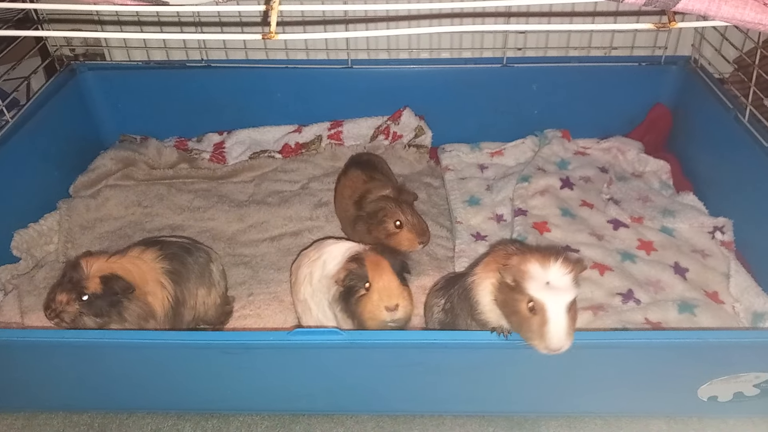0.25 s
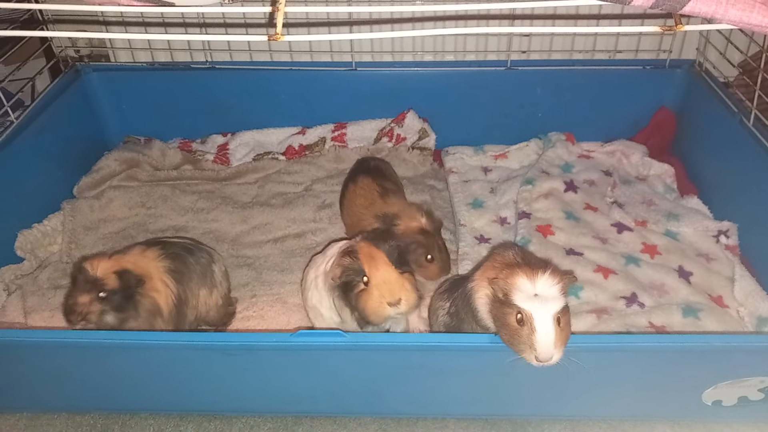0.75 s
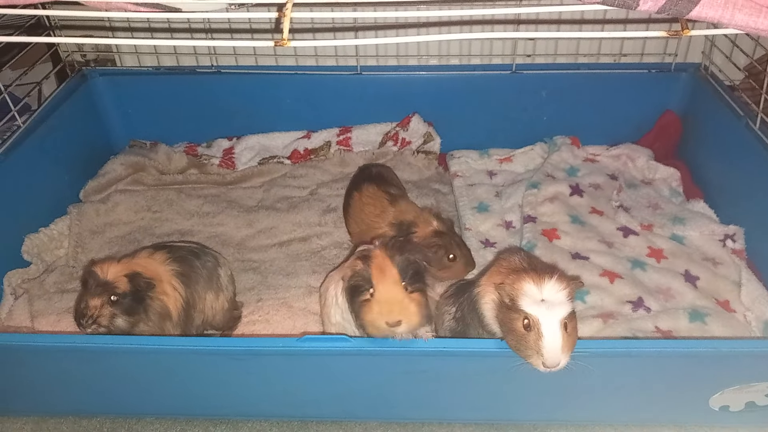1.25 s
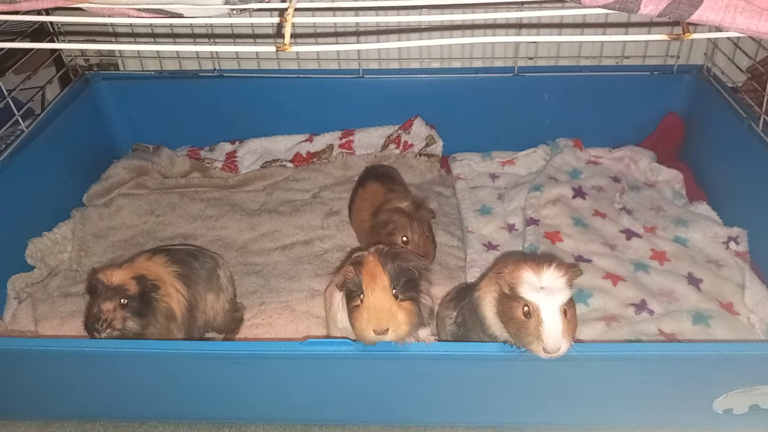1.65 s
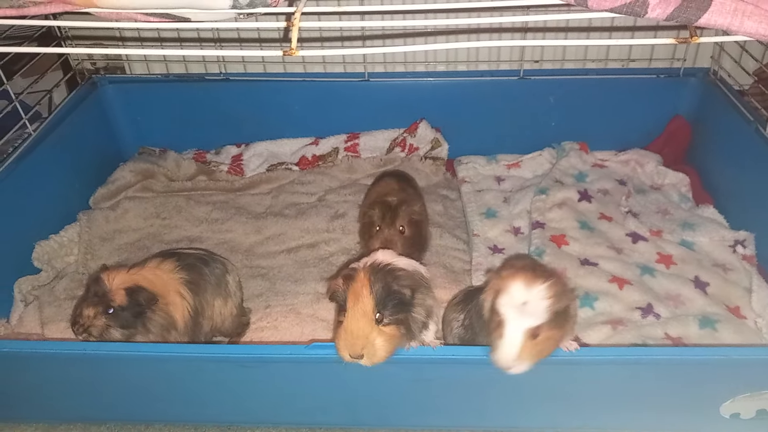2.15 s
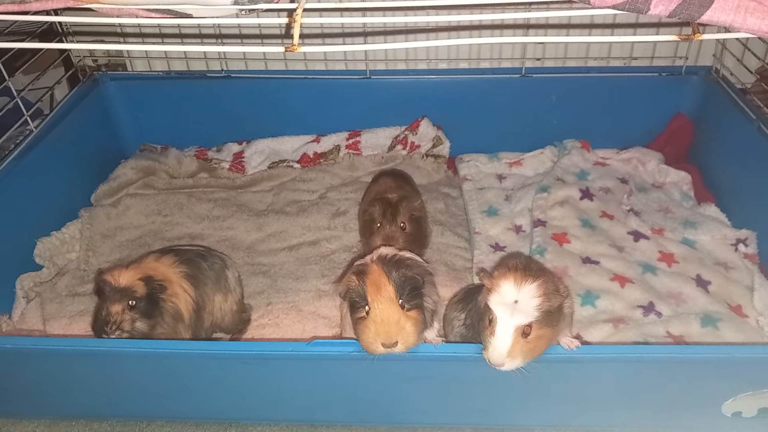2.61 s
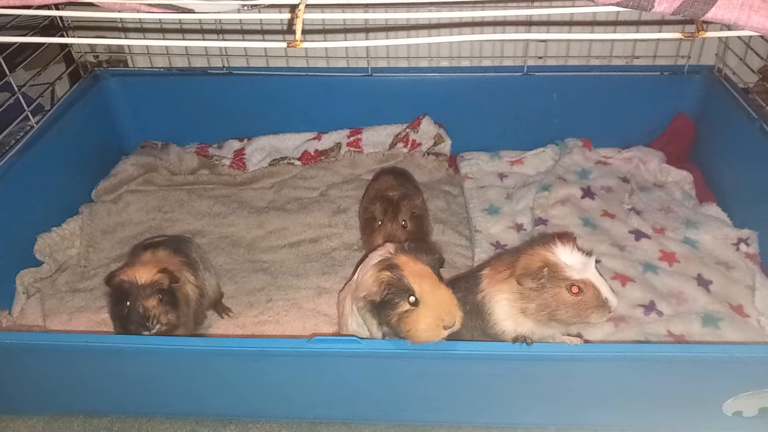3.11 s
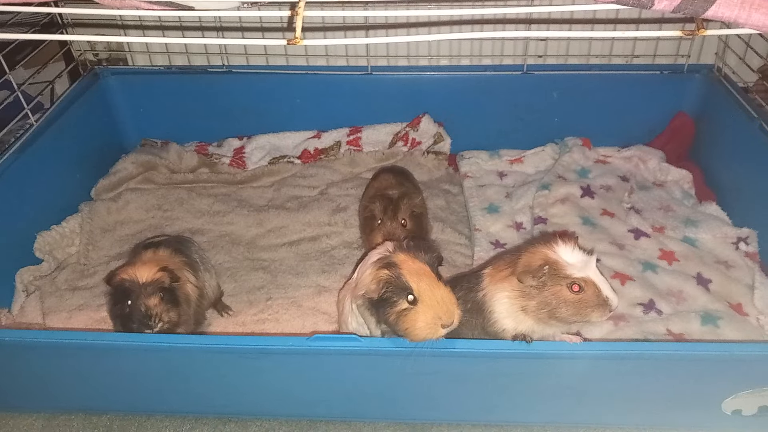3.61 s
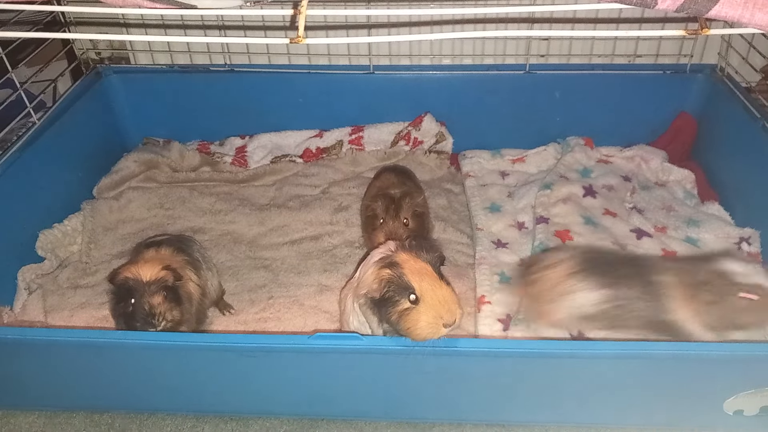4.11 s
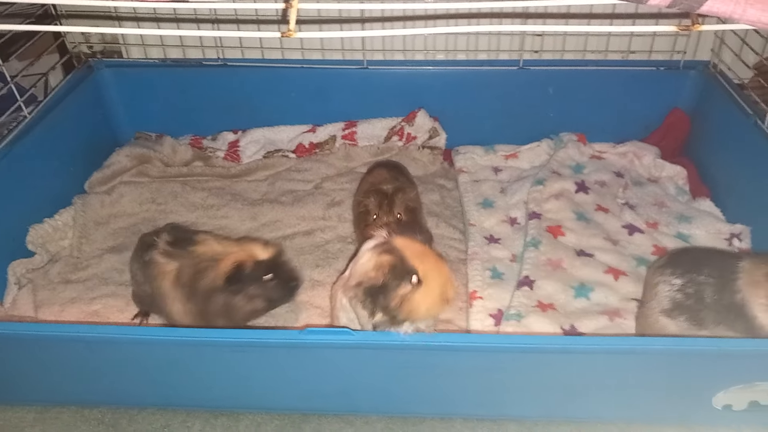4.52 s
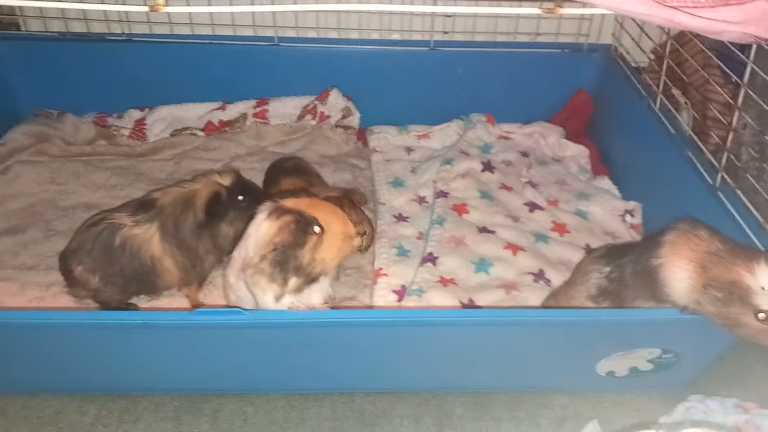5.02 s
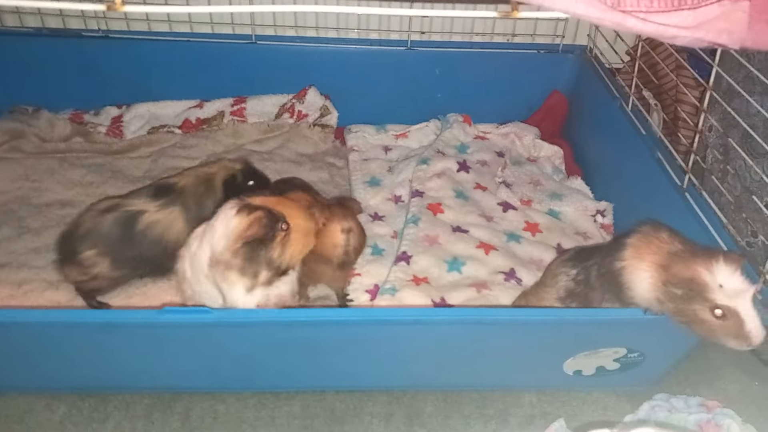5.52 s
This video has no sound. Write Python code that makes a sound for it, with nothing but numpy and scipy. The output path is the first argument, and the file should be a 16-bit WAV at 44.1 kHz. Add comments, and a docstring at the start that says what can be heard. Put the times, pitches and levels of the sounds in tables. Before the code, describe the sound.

Guinea pigs chatter in low bubbling croaks and thin rising whistles, with three sharp wheeks and a burst of claws scrabbling on a plastic tub.

```python
"""Guinea pigs beg at the rim of a plastic cage lined with fleece, close to the microphone in a quiet room.
They chatter in low pulsed croaks and thin rising whistles, and three times burst into a loud wheek of
gliding harmonics. Mostly in the middle they shift about: paws ring the tub's modes, claws crack in short
noise bursts, and fur brushes the fleece in grains and hiss. Echoes of cage and room lie behind it all."""
import sys
import numpy as np
from scipy import signal
from scipy.fft import rfft, irfft, next_fast_len
from scipy.io import wavfile

SR = 44100
rng = np.random.default_rng(int(sys.argv[2]) if len(sys.argv) > 2 else 0)


def store_pcm(level_fs):
    """Save levels as 16-bit WAV."""
    pcm = np.round(np.clip(level_fs, -1, 1) * 32767).astype(np.int16)
    wavfile.write(sys.argv[1], SR, np.atleast_2d(pcm).T)


N = 254016  # length in samples

# Colour of fur on fleece and of claws on the tub. Each row: frequency in Hz, gain in dB.
RUSTLE_COLOUR = [(59, -50), (100, -12.5), (600, -13), (1000, -9.5), (1400, -15.5), (2050, -3),
                 (2800, -16.5), (3600, -9.5), (7450, -2.5), (9210, -10), (13800, -7.5), (16000, -17.5)]


def gain_of(db):
    """Decibels to amplitude."""
    return 10 ** (np.asarray(db) / 20)


def evened(x):
    """Scales to an rms of 1."""
    return x / np.sqrt(np.mean(x ** 2) + 1e-20)


def read(points, hz):
    """Reads a (Hz, value) table on a log-frequency axis."""
    f, value = np.transpose(points)
    return np.interp(np.log(hz + 1), np.log(f), value)


def add(mix, s, sound):
    """Mixes a sound in at time s, cut at both ends of the mix."""
    start = round(s * SR)
    sound = sound[max(-start, 0):]
    part = mix[max(start, 0):][:len(sound)]
    part += sound[:len(part)]


def colour(x, points):
    """Filters by a (Hz, dB) spectrum; its resonances ring after each impulse."""
    n = next_fast_len(x.shape[-1] + 2048)
    log_gain = np.log(gain_of(read(points, abs(np.fft.fftfreq(n, 1 / SR)))))
    # minimum phase: nothing sounds ahead of its impulse
    response = np.exp(np.conj(signal.hilbert(log_gain))[:n // 2 + 1])
    return irfft(rfft(x, n) * response, n)[..., :x.shape[-1]]


def wander(n, rate_hz):
    """Smooth random drift, rms about 1, that changes up to about rate_hz times a second."""
    size = next_fast_len(n + 4096)
    f = np.fft.rfftfreq(size, 1 / SR)
    spectrum = rfft(rng.standard_normal(size)) / (1 + (f / rate_hz) ** 4)
    return evened(irfft(spectrum, size))[:n]


def resonate(x, hz, width):
    """A resonance, width in Hz and gain 1, that follows the curve hz."""
    turn = np.exp(2j * np.pi * np.cumsum(hz) / SR)
    r = np.exp(-np.pi * width / SR)
    # shift the moving centre to 0 Hz, smooth, and shift back
    return 2 * (turn * signal.lfilter([1 - r], [1, -r], x / turn)).real


def air(shared=0.6):
    """Faint room rumble and microphone hiss: coloured noise, partly shared by both channels."""
    # Each row: frequency in Hz, gain in dB.
    air_colour = [(30, -20), (98, 5.5), (190, -1.5), (780, -9), (1910, -14.5), (7670, -20), (9460, -31),
                  (16000, -22)]
    level_db = -71.5
    noise = rng.standard_normal((2, N)) + shared * rng.standard_normal(N)
    return gain_of(level_db) * evened(colour(noise, air_colour))


def ports(x, side, lead_ms):
    """Two microphone ports: the left hears x sooner by lead_ms, and the body shades each by band."""
    hz = np.fft.rfftfreq(2 * N, 1 / SR)
    ratio = gain_of(read(side, hz))
    late = np.exp(-2j * np.pi * hz * lead_ms / 1000)
    pair = np.array([ratio, late]) / np.sqrt((1 + ratio ** 2) / 2)
    return irfft(rfft(x, 2 * N) * pair)[:, :N]


def room(x, walls_db, tail_db):
    """Quick echoes from the cage walls, then the short tail of a furnished room."""
    # Time for the tail to die by 60 dB. Each row: frequency in Hz, time in s.
    room_t60 = [(150, 0.26), (2700, 0.13), (15000, 0.14)]
    t = np.arange(SR // 3) / SR
    # the tail: sparse clicks after 6 ms, dying at its own pace in each band
    taps = rng.choice([-1., 1.], (2, len(t))) * (rng.random((2, len(t))) < 3000 / SR) * (t > .006)
    hz, when, z = signal.stft(taps, SR, nperseg=256)
    fading = gain_of(-60 * when / read(room_t60, hz)[:, None])
    tail = signal.istft(z * fading, SR, nperseg=256)[1][:, :len(t)]
    # the cage: sparser clicks after 2 ms
    walls = rng.standard_normal((2, len(t))) * (rng.random((2, len(t))) < 1500 / SR)
    walls = walls * (t > .002) * np.exp(-t / 0.0023)
    echo = sum(gain_of(db) * h / np.linalg.norm(h, axis=1, keepdims=True)
               for db, h in [(walls_db, walls), (tail_db, tail)])
    common = echo.mean(0)  # long waves reach both ports alike
    echo = common + colour(echo - common, [(150, -27), (800, 2.5)])
    return signal.oaconvolve(x, echo, axes=1)[:, :N]


def placed(x, side, lead_ms, walls_db, tail_db, shading=0.1):
    """A source with its echoes, which arrive from all round and so are less one-sided."""
    diffuse = ports(x, [(hz, shading * db) for hz, db in side], lead_ms)
    return ports(x, side, lead_ms) + room(diffuse, walls_db, tail_db)


def stroke(start, rise, t60, db):
    """The level of one stroke: it gathers speed evenly, then dies away."""
    t = np.arange(N) / SR - start
    return np.clip(t / rise, 0, 1) * gain_of(db - 60 * np.maximum(t - rise, 0) / t60)


def rustle(grains_per_s=2000, spread_db=4.0, smooth=0.69, catch_db=1.5,
           scrape_hz=6000, scrape_width=1500, roam=0.5):
    """Fibres catch and let go: tiny snaps over a brushing hiss, with a scrape that roams as contact shifts."""
    # Strokes of fur and paws on fleece and plastic. Each row: start in seconds, rise in seconds,
    # time to die by 60 dB in seconds, level in dB before the mix, fizz in dB relative to the stroke.
    strokes = [ (2.456, 0.0067, 0.9, -47, -12), (2.555, 0.0081, 2.5, -53, -12),
               (3.036, 0.0024, 0.63, -41.5, -12), (3.092, 0.0065, 0.1043, -30, 2),
               (3.125, 0.014, 0.07, -30.5, -5), (3.174, 0.0038, 0.1, -42, -8),
               (3.308, 0.019, 0.3, -55.5, -20), (3.392, 0.027, 0.44, -38.5, 0),
               (3.435, 0.0087, 0.27, -33, -8), (3.468, 0.016, 0.2, -32, -5),
               (3.565, 0.014, 0.035, -30.5, 7.5), (3.75, 0.007, 1.52, -45, -12),
               (3.8, 0.063, 0.13, -44, -13), (3.908, 0.066, 0.3748, -38, -3),
               (4.097, 0.057, 0.116, -35, -3.5), (5.652, 0.0086, .2, -56.5, -12)]
    powers = np.array([stroke(*row[:4]) for row in strokes]) ** 2
    level = np.sqrt(powers.sum(0))
    fizz_level = np.sqrt(gain_of([row[-1] for row in strokes]) ** 2 @ powers)
    # the lightest touches barely sound
    grip = gain_of(catch_db * wander(N, 88.44)) * level / (level + gain_of(-65))
    snaps = rng.standard_normal(N) * (rng.random(N) < grains_per_s / SR)
    snaps = snaps * gain_of(spread_db * np.minimum(rng.exponential(1, N), 3))
    brush = evened(snaps) + smooth * rng.standard_normal(N)
    scrape = resonate(brush, scrape_hz * np.exp(roam * wander(N, 25)), scrape_width)
    fizz = evened(colour(brush, [(6000, -34.5), (11000, -4), (13500, -1), (16000, -10.5)]))
    body = evened(colour(brush + scrape, RUSTLE_COLOUR))
    return grip * (level * body + fizz_level * fizz)


def claws(decay=0.0032):
    """Each claw makes one short dry crack: noise that dies within milliseconds (decay in s)."""
    # Each row: time in seconds, starting level in dB before the mix.
    ticks = [(0.966, -47), (2.4876, -36.5), (3.0943, -20), (3.115, -25.5), (3.1362, -26), (3.1815, -26),
             (3.228, -42), (3.414, -27.5), (3.4433, -11), (3.475, -17.5), (3.502, -36), (3.5214, -31),
             (3.5552, -29), (4.1582, -25)]
    out, t = np.zeros(N), np.arange(SR // 30) / SR
    for s, db in ticks:
        noise = evened(colour(rng.standard_normal(len(t)), RUSTLE_COLOUR))
        add(out, s, gain_of(db) * np.exp(-t / decay) * noise)
    return out


def steps(scuff_db=-9, scuff_decay=0.021, thud_db=-2.0, thud_t60=0.038):
    """Paws ring the tub: weight booms its floor, a hard touch knocks its wall, each spot thuds at its pitch."""
    # Paws landing. Each row: time in seconds, level in dB before the mix, floor boom in dB,
    # wall knock in dB, thud pitch in Hz; boom and knock are relative to the level.
    landings = [(2.694, -40.5, -15, -6, 253), (2.836, -35, -40, -2, 338), (3.053, -43, -0.5, -6, 268),
                (3.09, -37.5, -0.5, -3.5, 210), (3.139, -40, 2.5, 1, 439), (3.178, -42.5, 2.5, -18, 454),
                (3.228, -49.5, -10, -1, 353), (3.444, -53, -24.5, -15.5, 477), (3.755, -40, -9.5, 11, 276),
                (4.165, -47.5, -4.5, 2, 334)]
    # Modes of the plastic tub. Each row: nominal frequency in Hz, gain in dB,
    # time to die by 60 dB in seconds.
    tub = [(110.4, -1, 0.12), (145, -5, 0.11), (184.3, -9.5, 0.075), (977, -12, 0.04), (1914, 9.5, 0.0066)]
    out, t = np.zeros(N), np.arange(SR // 4) / SR
    for s, db, boom_db, knock_db, thud_hz in landings:
        touch = [(130, boom_db), (600, 0.0031), (1400, knock_db)]
        ring = np.zeros(len(t))
        for k, (hz, mode_db, t60) in enumerate(tub):
            heights = gain_of(mode_db + read(touch, hz) - 60 * t / t60)
            detune = rng.uniform(0.88, 1.04)  # each landing shifts each mode
            ring += heights * np.sin(2 * np.pi * hz * detune * t) * (-1) ** k
        thud = gain_of(thud_db - 60 * t / thud_t60) * np.sin(2 * np.pi * thud_hz * t)
        scuff_colour = [(60, -5), (thud_hz, 8.5), (700, -8.0), (2000, knock_db - 11.0), (5000, -32)]
        scuff = evened(colour(rng.standard_normal(len(t)), scuff_colour))
        scuff = gain_of(scuff_db) * scuff * np.exp(-t / scuff_decay)
        onset = 1 - np.exp(-t / 0.00064)
        add(out, s, gain_of(db) * (ring + thud + scuff) * onset)
    return out


def gated(start, end, fade):
    """The times of a call and its soft on-off gate."""
    t = np.arange(start - fade, end + fade, 1 / SR)
    edge = np.clip(np.minimum(t - t[0], t[-1] - t) / fade, 0, 1)
    return t, np.sin(np.pi / 2 * edge) ** 2


def arched(t, start, length, db, swell_db, arch_db):
    """Progress 0-1 through a call, an arch that tops at its middle, and the level that follows both."""
    u = np.clip((t - start) / length, 0, 1)
    arch = 1 - (2 * u - 1) ** 2
    return u, arch, db + swell_db * (u - .5) + arch_db * (arch - 1)


def brightened(throat, s):
    """The throat's colour at time s: urgency lifts its treble and thins its middle."""
    # Urgent chatter is brighter than calm chatter. Each row: time in seconds, treble lift in dB.
    urgency = [(0, 7.5), (0.8, 0), (4.45, -1.5), (4.8, -18), (5.4, -34.5)]
    lift_db = np.interp(s, *np.transpose(urgency))
    # (Hz, share of the lift)
    share = [(350, 0), (600, -.5), (1000, 0), (1400, .1), (2000, -.25), (2900, -.35), (3600, 1)]
    return [(hz, db + lift_db * read(share, hz)) for hz, db in throat]


def puffs(turns):
    """Air escapes in a puff once in every cycle of the vocal folds."""
    return evened(np.exp(-(turns % 1) / 0.814) * rng.standard_normal(len(turns)))


def harmonics(turns, hz, multiples, throat):
    """Lines at multiples of the pitch, shaped by the throat, with a total rms of 1."""
    k = multiples[:, None]
    heights = gain_of(read(throat, k * hz)) * (k * hz < SR / 2)
    return (heights * np.sin(2 * np.pi * k * turns)).sum(0) / np.sqrt((heights ** 2).sum(0) / 2)


def croak(row, jitter=.14, mouth_db=11, mouth_width=300, opening_hz_per_s=2400, quiver=.07, throb_db=2.0):
    """Low pulses over a chest hum turn irregular and airy while the mouth resonance quivers and climbs."""
    # Each row: frequency in Hz, gain in dB before urgency.
    croak_throat = [(150, -29.5), (330, -9), (600, -10.5), (950, 0), (1550, -3.5), (2000, -5.5),
                    (2700, -13.5), (3400, -26), (4300, -23), (5400, -49), (7700, -16), (10000, -45)]
    arch_db = 10  # both ends lie this far under the middle, apart from the swell
    roughen_per_s, rough_top = 4.16, 0.78  # it grows rougher as it goes, up to a limit
    settle, settle_s, climb_per_s = .13, 0.02, 0.89  # an extra sharp share settles over a slow climb
    start, length, hz, level_db, swell_db, first_rough, mouth_hz, hum_db = row
    t, gate = gated(start, start + length, fade=0.0087)
    db = arched(t, start, length, level_db, swell_db, arch_db)[2] + throb_db * wander(len(t), 70)
    age = t - t[0]
    mouth = (mouth_hz + opening_hz_per_s * age) * (1 + quiver * wander(len(t), 37))
    rough = np.clip(first_rough + roughen_per_s * (t - start), 0, rough_top)
    glide = 1 + settle * np.exp(-age / settle_s) + climb_per_s * (age - length / 2)
    turns = np.cumsum(hz * (glide + jitter * rough * wander(len(t), 170))) / SR
    pulses = evened(sum(np.cos(2 * np.pi * k * turns) for k in range(1, 32)))
    # the hum fades as the voice breaks up
    hum = gain_of(hum_db) * (1 - rough) * np.sqrt(2) * np.cos(2 * np.pi * turns)
    drive = (1 - rough) * pulses + rough * puffs(turns)
    mouthed = drive + gain_of(mouth_db) * resonate(drive, mouth, mouth_width)
    voice = colour(mouthed, brightened(croak_throat, t[0]))
    return t[0], gate * gain_of(db) * (evened(voice) + hum)


def whistle(row, jitter=0.023, shimmer_db=3, airy_db=-14.0, waver=.016, shaky_hz=1000):
    """A thin, unsteady voice that scoops and slides upward, hoarse when low and purer when high."""
    # Each row: frequency in Hz, gain in dB before urgency.
    soft_throat = [(620, -1.5), (1250, 5.5), (1800, -6), (2300, -2.5), (2900, -14), (3500, -19),
                   (4400, -19.5), (5300, -41.5), (7600, -15.5), (9600, -40)]
    arch_db = 3.5  # both ends lie this far under the middle, apart from the swell
    start, length, first_hz, last_hz, scoop, level_db, swell_db = row
    t, gate = gated(start, start + length, fade=.009)
    u, arch, db = arched(t, start, length, level_db, swell_db, arch_db)
    hz = first_hz * (last_hz / first_hz) ** u * 2 ** (-scoop * arch / 12)
    throat = brightened(soft_throat, t[0])
    unsteady = np.minimum(hz / shaky_hz, 1) ** 2  # low moans hold their pitch
    shake = jitter * wander(len(t), 170) + waver * wander(len(t), 32)
    turns = np.cumsum(hz * (1 + unsteady * shake)) / SR
    hoarse = evened(colour(puffs(turns), [(200, -30)] + throat)) * gain_of(airy_db) * 1000 / hz
    pure = np.clip((hz - 800) / 1000, 0, .5)  # share of a plain sine
    lines = harmonics(turns, hz, np.arange(1, 15), throat)
    voice = (1 - pure) * lines + pure * np.sqrt(2) * np.sin(2 * np.pi * turns) + hoarse
    return t[0], gate * voice * gain_of(db + shimmer_db * wander(len(t), 100))


def wheek(rows, jitter=.0055, rasp=.0045, broken_rasp=.026, hiss_db=-18, flutter_db=2):
    """A piercing open-mouthed whistle that breaks up at the top; strain adds lines between the harmonics."""
    # Each row: frequency in Hz, gain in dB.
    wide_throat = [(3500, -11.5), (4700, -6.5), (5800, -11), (7300, 0.5), (8300, -2), (9200, -7.5),
                   (10300, -3.5), (12200, -20), (14300, -10), (16000, -13.5)]
    # Strain makes strong and weak cycles alternate, most of all in the first wheek.
    # Each row: time in seconds, half-pitch lines in dB relative to the overtones.
    strain = [(1.385, -37), (1.41, -0.5), (1.5, -6), (2.43, -7), (2.86, -48)]
    break_hz, break_span_hz = 2600, 691  # pushed above this pitch, it breaks into a rasp over this span
    s, *columns = np.transpose(rows)
    t, gate = gated(s[0], s[-1], fade=0.007)
    hz, low_db, high_db = [np.interp(t, s, c) for c in columns]
    rough = rasp + broken_rasp * np.clip((hz - break_hz) / break_span_hz, 0, 1)
    turns = np.cumsum(hz * (1 + jitter * wander(len(t), 140) + rough * wander(len(t), 900))) / SR
    overtones = harmonics(turns, hz, np.arange(2, 9), wide_throat)
    halves = harmonics(turns, hz, np.arange(7) + .5, wide_throat)
    hiss = evened(colour(rng.standard_normal(len(t)), [(1500, -14.0)] + wide_throat))
    strain_db = np.interp(t, *np.transpose(strain))
    upper = overtones + gain_of(strain_db) * halves + gain_of(hiss_db) * hiss
    high_db = high_db + flutter_db * wander(len(t), 160)
    fundamental = np.sqrt(2) * np.sin(2 * np.pi * turns)
    return t[0], gate * (gain_of(low_db) * fundamental + gain_of(high_db) * upper)


def chorus(voice, calls):
    """All calls of one kind on one track."""
    out = np.zeros(N)
    for rows in calls:
        add(out, *voice(rows))
    return out


def scene():
    """Voices from the left of centre, scuffling from the right, all close to the microphone."""
    # Soft whistles. Each row: start in seconds, length in seconds, first pitch in Hz, last pitch in Hz,
    # scoop below the straight glide in semitones, level in dB, swell from start to end in dB.
    whistles = [ (0, 0.073, 635, 770, 2, -47, 2.5), (0.148, 0.051, 1316, 1638, 0.5, -49, 3),
                (0.202, 0.03, 2000, 2280, 1.5, -51, -8), (0.249, 0.024, 1114, 1544, 0, -63, -7),
                (0.407, 0.053, 621, 771, 1.2, -54, 0.5), (0.453, 0.057, 867, 1300, 0, -53.5, 7),
                (0.463, .11, 1408, 2106, 1.84, -54.5, 7), (0.603, 0.076, 1025, 1160, 4.5, -61.5, -7),
                (0.783, 0.054, 645, 764, 0.5, -53.5, -2), (0.841, 0.047, 854, 1242, -0.5, -50, 2),
                (0.871, 0.051, 850, 1290, 3, -54, 10), (0.912, 0.049, 1985, 2400, 0, -54.5, -3),
                (1.164, 0.13, 1167, 2240, -2, -54.5, 4), (1.741, 0.092, 1020, 1368, -1.5, -52.5, 10),
                (1.852, 0.055, 1374, 1640, 1, -56, 1.5), (2.144, 0.046, 989, 1806, 1.6, -54, 3),
                (2.22, .016, 1754, 2050, 0.7, -54, -5), (2.271, .02, 1920, 1945, 0, -53, -6),
                (2.331, 0.12, 1977, 2327, 1, -50.5, 10), (2.715, 0.052, 979, 1462, 5, -51, 12),
                (2.765, 0.025, 1411, 2130, -0.5, -50.5, -9), (2.8, 0.055, 2066, 2255, 0, -53, 12),
                (3.631, 0.046, 806, 1128, 1, -60.5, 3), (3.879, 0.03, 873, 974, 0.5, -52, 11),
                (3.973, 0.041, 813, 1574, 1, -50, 6), (4.023, 0.135, 1794, 2117, -0.7, -57.5, -10),
                (4.236, 0.07, 772, 794, 2, -52, 0.5), (4.311, 0.075, 949, 1393, -1.5, -50, 2.5),
                (4.381, 0.086, 1549, 2190, 0.4, -47.5, 3.5), (4.468, 0.062, 2510, 3470, -0.12, -59, -1.5),
                (4.687, 0.14, 619, 1156, 1.4, -54, 13.5), (4.831, 0.049, 1377, 1707, 2, -58, -4),
                (4.88, 0.033, 1775, 2430, 2.5, -54.5, 11.5), (5.142, .064, 962, 2083, 2.6, -56, -2),
                (5.399, 0.073, 658, 734, 0.85, -56, 0.5), (5.485, 0.078, 877, 1061, 1, -59.5, 1),
                (5.655, 0.094, 558.6, 910, 3, -64.5, -0.5)]
    # Low croaks. Each row: start in seconds, length in seconds, pitch in Hz before its glide,
    # level in dB before the mix, swell from start to end in dB, roughness at the start (0-1, before its
    # limit), first mouth resonance in Hz, chest hum in dB relative to the voice before it fades.
    croaks = [ (0.071, 0.13, 363, -43.5, -7.5, 0.32, 1330, -7.5),
              (0.383, 0.051, 314.6, -50.5, -7, 0.18, 1110, -13),
              (0.445, 0.098, 337, -52, -1, 0.9, 1220, -11), (0.754, 0.04, 320, -51, 1, 0.29, 980, -6),
              (1.118, 0.07, 333.5, -52, 9, 0.53, 790, 2.5), (1.68, 0.12, 329, -46, 7, 0.13, 915, 0),
              (1.784, 0.14, 239.6, -51.5, -1, 0.33, 1280, -5.5),
              (2.076, 0.0717, 324.2, -49.5, 16, 0.17, 950, 1.5),
              (2.147, .055, 326.7, -48.5, -4, 0.63, 1060, -12),
              (4.278, .14, 364.3, -59, -17.5, 0.43, 1030, -0.5),
              (4.493, 0.047, 332.5, -54, 3.5, 0.46, 950, -3.5),
              (5.067, 0.13, 285.6, -54, 4, 0.26, 830, -10)]
    # Loud wheeks, one table a call. Each row: time in seconds, pitch in Hz,
    # fundamental in dB and overtones in dB, both before the mix.
    wheeks = [
        [(1.381, 2480, -34, -53.5), (1.39, 2323, -25.5, -42), (1.425, 2240, -32, -44.5),
         (1.443, 2369, -19, -42.5), (1.466, 2444, -24.5, -44.5), (1.476, 2800, -30, -51.5),
         (1.488, 2935, -28.5, -46), (1.508, 3495, -43.5, -50), (1.531, 3210, -73, -59.5)],
        [(2.426, 2545, -45, -52.5), (2.436, 2716, -24.5, -55), (2.448, 2560, -34.5, -50),
         (2.47, 2520, -29, -76), (2.48, 2943, -30.5, -79), (2.5, 3150, -43.5, -75)],
        [(2.861, 2018, -39.5, -39.5), (2.886, 2107, -29, -36), (2.908, 2130, -30.5, -34),
         (2.918, 2304, -19, -28), (2.948, 2380, -15.5, -29.5), (2.96, 2590, -25, -29), (2.975, 2613, -13, -25),
         (2.997, 2700, -14.5, -33), (3, 3330, -33, -32.5), (3.022, 3840, -30, -23), (3.034, 4283, -36.5, -34)],
    ]
    # Left minus right level of chatter, wheeks and scuffling. Each row: frequency in Hz, level in dB.
    voice_side = [(300, -1), (900, 11.5), (2400, 24), (4000, 0.5), (14000, 3)]
    cry_side = [(2400, 11.5), (4500, 0), (7500, 2), (14000, 0.5)]
    scuffle_side = [(200, -4.5), (2200, 10), (4400, -17.5), (15000, -15)]
    chatter = chorus(whistle, whistles) + gain_of(-2.5) * chorus(croak, croaks)
    scuffle = gain_of(-4.5) * rustle() + gain_of(-7.5) * claws() + gain_of(3.0) * steps()
    cries = gain_of(-2.0) * chorus(wheek, wheeks)
    return (placed(chatter, voice_side, lead_ms=0.1964, walls_db=-10.0, tail_db=-12.0)
            + placed(cries, cry_side, lead_ms=.145, walls_db=-12, tail_db=-10)
            + placed(scuffle, scuffle_side, lead_ms=-0.5285, walls_db=-6.0, tail_db=-17.0)
            + air())


def record(dry):
    """The recorder's bass cut at 50 Hz and its band limit near 16 kHz."""
    dry = signal.sosfilt(signal.butter(2, 50, "high", fs=SR, output="sos"), dry)
    band_limit = signal.firwin(511, 16050, window=("kaiser", 9), fs=SR)
    return signal.oaconvolve(dry, band_limit[None], "same")


dry = scene()
out = record(dry)
store_pcm(out)
```